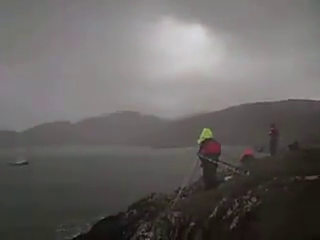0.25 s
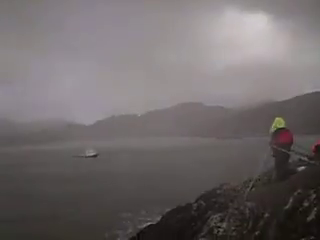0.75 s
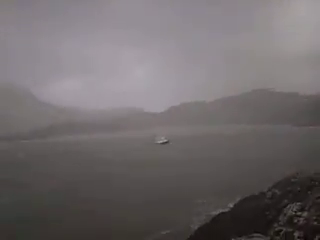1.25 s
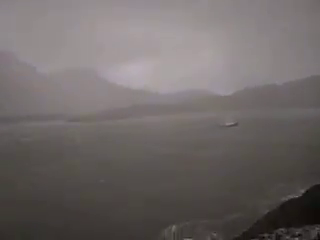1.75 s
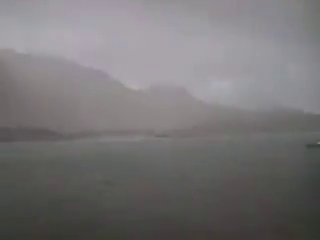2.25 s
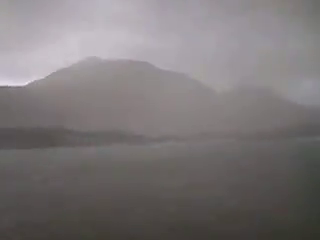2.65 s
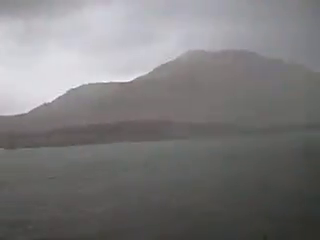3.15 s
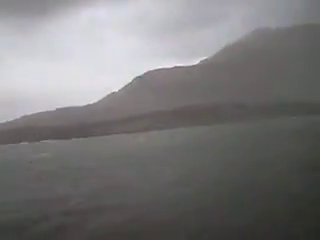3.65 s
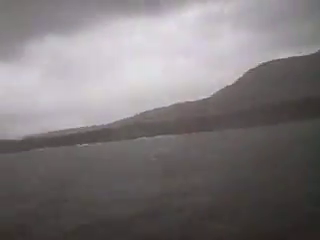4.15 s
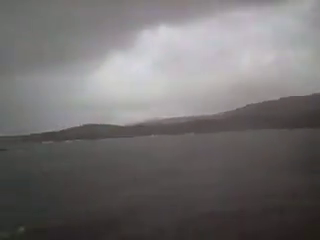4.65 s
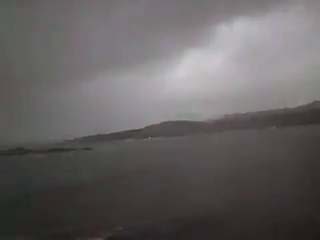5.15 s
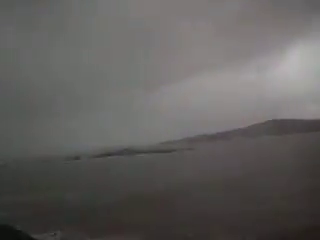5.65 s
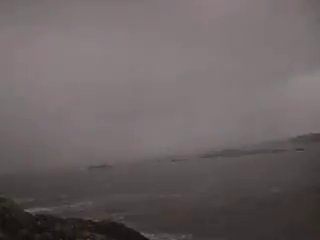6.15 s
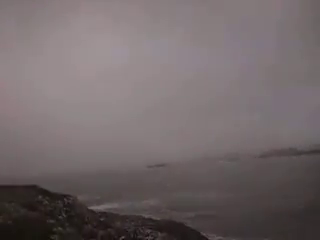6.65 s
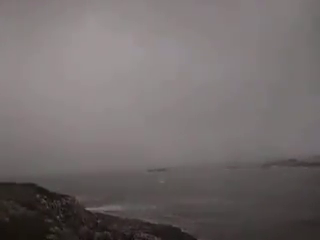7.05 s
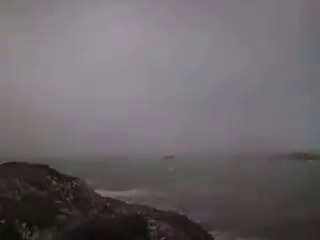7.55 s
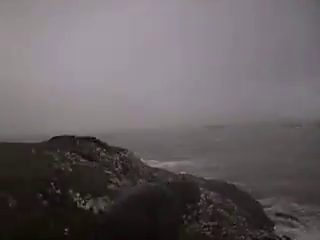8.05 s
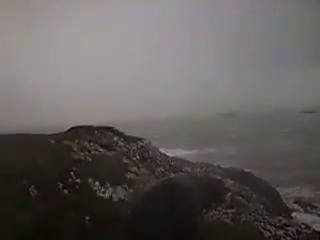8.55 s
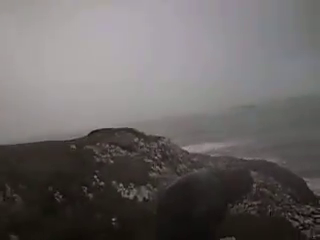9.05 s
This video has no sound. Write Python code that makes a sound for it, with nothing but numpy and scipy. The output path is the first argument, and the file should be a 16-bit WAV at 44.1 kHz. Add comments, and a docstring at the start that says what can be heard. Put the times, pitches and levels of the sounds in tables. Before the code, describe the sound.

Outdoors on a rocky shore, hail falls on a small hand-held camera, heard from its built-in microphone. At first there is a faint, flickering hiss of hail on rock and water, a barely audible wavering low hum and very light ticking. A tap at 0.15 s is followed by hard, overloaded cracks near 0.4 to 0.55 s and more around 0.85 s. From about 1 s the hits crowd together, and by 1.6 s patter and hiss have swelled. Dense, irregular clicking then continues, with soft ticks, brittle plastic snaps and blunt knocks in uneven clusters, some with a short loose rattle. Especially strong blows land near 2.15, 5.6 and 8.1 s. Faint hollow notes sound around 6.2, 7.2 and 8.6 s. The sound is close, dry and narrow-band, dull on top, distorted on the loudest hits, and ends still hailing at about 9.3 s.

```python
"""Hail on a rocky shore, heard through the microphone built into a small hand-held camera.
From the start noise bands hiss like hail on rock and water, over a low hum of two wavering sines.
Single stones, loud and soft, crack on the plastic housing, ring its modes and shove the diaphragm;
the strongest overload the input. Over the first 1.6 s the patter of small stones and the hiss swell.
The hail goes on to the end, and from about 6 s three stones also sound a low hollow note."""
import sys
import numpy as np
from scipy import signal
from scipy.io import wavfile

SR = 44100
rng = np.random.default_rng(int(sys.argv[2]) if len(sys.argv) > 2 else 0)


def digitize_waveform(pressure):
    """Quantize a signal to 16-bit integers and store it at the path in sys.argv[1].

    Rows of a 2-D input are taken as channels; values are limited to [-1, 1].
    """
    field = np.atleast_2d(pressure).T
    bounded = np.clip(field, -1, 1)
    quanta = np.round(bounded * 32767).astype(np.int16)
    wavfile.write(sys.argv[1], SR, quanta)


N = 409248


def from_db(db):
    """Decibels to gain."""
    return 10 ** (np.asarray(db) / 20)


def rms_one(x):
    """Scale to rms 1."""
    return x / np.sqrt(np.mean(x ** 2) + 1e-20)


def in_time(rows):
    """Draw straight lines between the rows of a table: one curve per column, at every sample."""
    s, *columns = np.transpose(rows)
    return [np.interp(np.arange(N) / SR, s, column) for column in columns]


def drift(corner_hz):
    """Slow random wander of spread 1: noise through two one-pole low-passes."""
    step = 40   # samples between the slow values
    r = np.exp(-2 * np.pi * corner_hz * step / SR)
    noise = rng.standard_normal(N // step + 2002)
    slow = signal.lfilter([1], [1, -2 * r, r * r], noise)[2000:]   # drop the filter's run-in
    return np.interp(np.arange(N) / step, np.arange(len(slow)), rms_one(slow))


def ring(clicks, hz, t60_s):
    """A two-pole resonator: each unit click starts a sine of height 1 that falls 60 dB in t60_s."""
    r = np.exp(-np.log(1000) / (t60_s * SR))
    w = 2 * np.pi * hz / SR
    return signal.lfilter([0, np.sin(w)], [1, -2 * r * np.cos(w), r * r], clicks + 1e-18)


def clicks_at(seconds, sizes):
    """One-sample clicks of the given sizes."""
    out = np.zeros(N)
    places = np.round(np.asarray(seconds) * SR).astype(int)
    np.add.at(out, np.minimum(places, N - 1), sizes)
    return out


# the two hum tones, levels before their shared waver: pitch_hz [Hz], level_db [dB rms]
HUM_TONES = [(36, -52.5), (66, -48.5)]


def hum():
    """Two low sines whose pitch and level waver a little together."""
    waver_cycles = np.cumsum(1.18 * drift(2.3)) / SR   # pitch wander, 1.18 Hz spread
    tones = 0
    for pitch_hz, level_db in HUM_TONES:
        cycles = pitch_hz * np.arange(N) / SR + waver_cycles + rng.random()
        tones = tones + np.sqrt(2) * from_db(level_db) * np.sin(2 * np.pi * cycles)
    return from_db(drift(10)) * tones


# tone of the hiss, relative before the whole is levelled: band_hz [Hz], density_db [dB per Hz]
HISS_TONE = [(30, -18.5), (75, 5), (565, -2.5), (1200, 6.5), (1500, -6.5), (2600, 3), (3600, -18.5)]


def far_hiss(hiss_db, patchy_db):
    """Hail on rock and water blurs into noise: half-octave bands, each flickering a little."""
    edges_hz = 28 * 2 ** np.arange(0, 8, .5)
    white = rng.standard_normal((2, N))   # neighbouring bands take different noise
    tone_hz, tone_db = np.transpose(HISS_TONE)
    out = 0
    for k, (low, high) in enumerate(zip(edges_hz, edges_hz[1:])):
        band_pass = signal.butter(2, [low, high], "band", fs=SR, output="sos")
        band = signal.sosfilt(band_pass, white[k % 2])
        centre_db = np.interp(np.log(low * high) / 2, np.log(tone_hz), tone_db)
        out = out + band * from_db(centre_db + patchy_db * drift(14.0))
    return from_db(hiss_db) * rms_one(out)


# strength and decay of each housing mode, damped panels first, then longer-ringing inner parts:
# level_db [dB, relative within one blow], t60_s [s to fall 60 dB]
HOUSING_MODES = np.array([(-24.5, 0.031), (-18.5, 0.022), (-15.5, 0.053), (-6.5, 0.021), (-6.5, 0.021),
                 (-6, 0.02), (-7.0, 0.021), (-7, 0.016), (0.5, 0.0042), (-5.5, 0.021), (-4, 0.014),
                 (-4.5, 0.0093), (-5, 0.0095), (-11.5, 0.0089), (-2.5, 0.006), (-1, 0.003), (-24.5, 0.081),
                 (-19.0, 0.11), (-24, 0.16), (-30.5, 0.14), (-30.5, 0.22), (-35, 0.17), (-27, 0.25),
                 (-35, 0.15), (-37, 0.12)])
# pitch of each housing mode, in the same order: pitch_hz [Hz]
MODE_HZ = np.array([625, 790, 1050, 1200, 1310, 1730, 1860, 2060, 2350, 2630, 2760, 3200, 3600, 3950, 1400, 3350, 638, 858, 1338, 1570, 1888, 2403, 2542, 2940, 3035])
BRIGHT_INNER = 0.4   # share of a stone's brightness that reaches the longest-ringing parts


def colour(bright_db, shake_db):
    """The landing spot tilts high modes against low ones and shakes the inner parts more or less."""
    t60_s = HOUSING_MODES.T[1]
    height = np.clip(np.log2(MODE_HZ / 1800), -.5, .5)   # low modes -.5, high modes +.5
    lasting = np.clip(np.log10(t60_s / 0.037), 0, 1)   # damped panels near 0, the longest ringing 1
    tilt = height * (1 - (1 - BRIGHT_INNER) * lasting)
    return np.outer(bright_db, tilt) + np.outer(shake_db, lasting)


COMMON_SHOVE_DB, MIDDLE_SHAKE_DB = -21.5, -2.5   # dB; shake is the middle of a random spread


def chance_colour(s, peak_db):
    """Blows with one common shove level, each on a random spot: duller or brighter, shaking more or less."""
    bright_db, shake_db = 7.0 * rng.standard_normal((len(s), 2)).T
    shove_db = np.full(len(s), COMMON_SHOVE_DB)
    return s, peak_db, colour(bright_db, MIDDLE_SHAKE_DB + shake_db), shove_db


def patter(per_s, faint_db):
    """Small stones fall at random moments in loose swarms, many faint and a few louder."""
    swarm = from_db(4.0 * drift(5))
    born = np.flatnonzero(rng.random(N) < per_s * swarm / SR)
    size_db = 5.95 * np.minimum(rng.exponential(1, len(born)), 2.8)
    return chance_colour(born / SR, faint_db[born] + size_db)


# single stones on the housing, with one common shove level and random brightness:
# start_s [s], peak_db [dB, before any flutter or overload]
PLAIN_STONES = [(1.085, -11.5), (1.113, -16), (1.195, -10), (1.322, -15.5), (1.632, -17), (1.644, -16.5),
                (1.692, -16), (1.784, -14), (1.794, -16.5), (1.814, -12.5), (2.012, -7), (2.41, -26),
                (2.539, -12.5), (2.67, -12), (2.842, -11), (3.011, -9), (3.351, -14), (3.449, -7),
                (3.697, -13), (3.747, -13.5), (3.765, -9), (4.061, -11), (4.081, -10.5), (4.104, -18),
                (4.176, -20), (4.200, -15), (4.243, -20), (4.283, -16), (4.321, -17), (4.441, -18),
                (4.485, -13.5), (4.616, -13), (4.675, -14.5), (4.766, -16), (4.939, -14.5), (5.091, -16),
                (5.151, -16), (5.224, -14), (5.249, -14.5), (5.341, -12), (5.372, -18), (5.471, -15.5),
                (5.518, -12), (5.528, -15), (5.613, -15), (5.687, -18.5), (5.834, -12.5), (5.851, -19),
                (6.165, -6.5), (6.432, -13), (6.678, -9), (6.956, -14), (7.248, -15.5), (7.342, -20),
                (7.408, -15), (7.543, -13), (7.564, -18), (7.594, -6.5), (7.678, -19), (7.697, -19.5),
                (7.809, -20), (7.853, -19), (7.882, -22), (8.002, -13.5), (8.047, -13), (8.341, -9),
                (8.459, -12.5), (8.522, -7), (8.563, -7), (8.831, -8.5), (8.839, -10.5), (8.898, -6.5),
                (9.000, -15), (9.007, -10.5), (9.040, -11), (9.096, -17), (9.143, -14), (9.261, -16)]


def plain_stones():
    """Single stones on the housing, with one common shove level and random brightness."""
    return chance_colour(*np.transpose(PLAIN_STONES))


FLUTTER_DB, FLUTTER_HZ = 3.0, 47   # spread in dB and corner of the random wander in Hz


def flutter():
    """Loose parts waver in level as they ring."""
    return from_db(FLUTTER_DB * drift(FLUTTER_HZ))


# stones that strike a hollow part, peak before the flutter: start_s [s], peak_db [dB]
HOLLOW_STONES = [(6.242, -18), (7.16, -24), (8.591, -17)]


def hollow_notes():
    """A few stones ring one low hollow part, a single fluttering mode."""
    start_s, peak_db = np.transpose(HOLLOW_STONES)
    return ring(clicks_at(start_s, from_db(peak_db)), hz=710, t60_s=0.13) * flutter()


# single stones on the housing, from soft taps to overloading cracks:
# start_s [s], peak_db [dB, before any flutter or overload], shove_db [dB, diaphragm shove against crack],
# bright_db [dB, high against low modes], shake_db [dB, shake of the ringing inner parts]
COLOURED_STONES = [(0.155, -12, -14, 13, -3), (0.375, 7, -3, -1, -1), (0.451, 4.5, -3.5, 1, 6),
                   (0.551, 2.5, -0.5, 7, 2), (0.676, -4, -44, 0, -12), (0.844, 1.5, -9, 4.5, 2.5),
                   (0.964, -1, -14, -1, -5.5), (1.039, 1.5, -7, 0.5, -5), (1.159, -2.5, -8, -0.5, 0),
                   (1.252, -0.5, -13.5, 1, -4), (1.305, -3.5, -10, 0, -5), (1.332, -3, -10.5, -3, -7),
                   (1.432, 4.5, -2.5, 4.5, 0), (1.455, -7.5, -9, 5, 4), (1.478, -7.5, -9, 1, -9),
                   (1.542, 3.5, -1.5, 3, 4.5), (1.579, -1, -6.5, 6.5, 10.5), (1.604, -4.5, -28, -5, 10),
                   (1.711, -7.5, -12.5, 13, 7), (1.842, 3, -20, 3, -6), (1.855, 4.5, 0.5, -3, -3),
                   (1.871, -3.5, -25, 2, -12), (1.902, -3.5, -13.5, -1.5, 3), (1.921, -3.5, -22, -1, -1),
                   (2.058, -6, -13, 1.5, -3), (2.075, -9, -29, -16, -4), (2.148, 8, -3, -11, -34),
                   (2.154, -3, -17, 7.5, 13), (2.184, -2.5, -11, 5, 13), (2.352, 4.5, -6, 3, 5),
                   (2.486, 0, -11, 1, -9), (2.63, -5, -34, 10, 3), (2.694, -6, -18, 0, 8),
                   (2.707, -3, -22, 1, 7.5), (2.746, -2.5, -13, -9, -4), (2.793, 4.5, -5.5, 11.5, -7),
                   (2.815, -2.5, -35, 3, -14), (2.861, -2.5, -11, -11, -1), (2.914, 3.5, -5, 8, -6),
                   (2.935, -3, -8, -6.5, 11.5), (2.955, -4, -13, -10, -17), (3.029, -2.5, -7, -1, -3),
                   (3.074, 2.5, -12, 0.5, -1.5), (3.114, -7.5, -7, -2, -9), (3.148, 2, -10.5, -2.5, -9),
                   (3.309, 2.5, -7.5, -7.5, -7), (3.335, -6, -19, 8, 1), (3.345, -4, -14, 0, -5),
                   (3.371, -5.5, -14, -8, -6), (3.399, -10, -5, -1, -7), (3.422, 2.5, 1, -0.5, 5),
                   (3.493, 0, -7, -8.5, -6), (3.574, -1, -3, 3, -2), (3.618, -10, -13, 20, -14),
                   (3.755, -5.0, -36, -2, -2), (3.783, 3, -9.5, 12, -18), (3.816, -2.5, -7.5, 0, 2),
                   (3.825, -3.5, -7.5, -3, -4), (3.847, -2.5, -11, 2, -1), (3.904, -10, -37, -12, 0),
                   (3.927, -3.5, -20, 5, -17), (3.972, -3.5, -27, -1, -2), (4.008, -4.0, -17, 7, -6),
                   (4.023, -4.5, -16, 3, -6), (4.044, -11, -18, -4, -5), (4.072, -3, -3.5, -8, 0),
                   (4.109, 1.5, -8, -8, 7), (4.149, -1, -10.5, 2, -34), (4.186, -3.5, -11, -5, 0),
                   (4.207, -6.5, -34, 17, -6), (4.223, -4, -16, -4.5, -8), (4.258, 3.5, -0.5, 5, -2),
                   (4.352, 0.5, -7.5, -1.5, 0), (4.383, -4, -13, -11, -9), (4.453, 4, -3, -4, -14),
                   (4.462, -5, -14, 17, 12), (4.539, -8.5, -15, -5.5, -2), (4.558, -0.5, -42, 1, -11),
                   (4.566, -1.5, -4, 19, -32), (4.631, -6.5, -6.5, -6, 0), (4.721, 2, -5.5, -0.5, 3.5),
                   (4.741, -4, -10, 3, -8), (4.823, -1.5, -0.5, -1, 0), (4.852, -2.0, -27, 2, -16),
                   (4.972, -6, -5, -1, 4), (4.989, -2, -14, -3, -9), (5.031, -6, -12, -38, -9),
                   (5.057, 1.5, -7, -9, 2), (5.077, -4.5, -23, -5.5, -8), (5.125, 1.5, -8.5, 6, 4),
                   (5.130, -5.5, -19, -4, -7), (5.201, 3, -5.5, 10, -6), (5.302, 1, -4, 11, 6),
                   (5.319, -3.5, -17, 5, -4), (5.395, -14, -23, -19, 8), (5.424, 1, -8.5, 2.5, -3),
                   (5.449, -3, -10, -6, -8), (5.548, 3.5, -5, 10, -1), (5.558, -5, -19, 4, -20),
                   (5.63, 7, -1.5, 11, 5), (5.804, -8, -20, 0, 3), (5.859, 5.5, -3, 5.5, -5),
                   (5.928, -6.5, -41, -9, 1), (6.021, -1, -10, -3, -32), (6.179, 1, -15, 20, -35),
                   (6.236, -1.5, -7, 16, -6), (6.241, -3, -25, -5, 4), (6.454, 2.5, -5.5, -6, -30),
                   (6.546, 4.5, -11.5, 0, -7), (6.602, 1, -15.5, -4, -14), (6.634, -3, -15, 4, -29),
                   (6.716, -6.5, -15, 1.5, 1), (6.758, -2.5, -40, 11, -10), (6.805, -9, -9, 5, 6),
                   (6.826, -1, -18.5, 9, 11), (6.834, -3, -7, -1, -14), (6.898, -2, -10.5, 17, -5),
                   (6.985, 0, -10.5, 4, -11), (7.008, -7, -10, 7, 13), (7.072, 0.5, -8.5, 1.5, -5),
                   (7.091, -5.5, -30, 16, 13), (7.096, -2, -5, -4, -13), (7.16, -5.5, -35, 6, -2),
                   (7.268, -2, -51, 18, -28), (7.366, -3.5, -32, 3, -18), (7.373, 0, -14, 3, -7),
                   (7.42, 0, -10, 0.5, 3), (7.487, 0.5, -9, -0.5, -6), (7.509, -6, -21, 14, 6),
                   (7.578, -3, -6, -0.5, -1), (7.619, -4, -31, 16, 1), (7.628, -3.5, -24, -8, -13),
                   (7.651, -10, -36, -13, 2), (7.758, -8.5, -9, -5, -22), (7.824, 0, -2.5, -3, -6),
                   (7.83, -2, -12, -4, -17), (7.945, -3, -13, 1.5, -6), (8.009, -2, -26, 8, -17),
                   (8.036, -11, -39, -24, -6), (8.07, -3.5, -20, -4.5, -26), (8.109, 7.5, -3, 22, 7),
                   (8.175, 0, -7, 17, -25), (8.236, 1.5, -2.5, 9, -22), (8.285, -0.5, -10, 0.5, 1),
                   (8.321, -3, -17, -7, -6), (8.443, -7, -1.5, 0, -3), (8.51, 2, -9.5, 6, -1),
                   (8.531, -1.5, -17, -2.5, -2), (8.571, -2.5, -13, 10, 3), (8.587, -1, -7, -2, 6),
                   (8.591, -4, -21, 12, -2), (8.621, -3, -7.5, -6, -26), (8.658, -5.5, -21, 7, -2),
                   (8.691, 2, -4.5, 0.5, 9), (8.714, -10, -7, 18, 1), (8.729, -2, -27, -3, -2),
                   (8.755, 0.5, -16, 10, -9), (8.769, -3, -18, 1, -9), (8.815, -9, -8, -3, 3),
                   (8.88, -8, -15, 7, 3), (8.891, -2.5, -3, 16, -11), (8.934, -9, -23, 18, -1),
                   (8.945, 4, -4, 12, 2), (9.056, 3.5, -7.5, -0.5, -20), (9.101, -2, -10, 4, 7.5),
                   (9.169, -13, -8, 1, 4), (9.189, -10, -15, 0, 12), (9.206, -3.5, -13, 3, 3),
                   (9.228, 0.5, -5.5, -1, -16), (9.239, -4, -25, 6, 0), (9.271, -2.5, -8, 11, -25.0)]


def coloured_stones():
    """Single stones from soft taps to overloading cracks, each with its own shove, brightness and shake."""
    start_s, peak_db, shove_db, bright_db, shake_db = np.transpose(COLOURED_STONES)
    return start_s, peak_db, colour(bright_db, shake_db), shove_db


THUMP_S, CONTACT_S = 0.00045, 0.00080   # s: rise of the shove, longest delay of a mode
SPOT_SPREAD_DB = 5.0   # dB, how much the landing spot changes the damped modes


def strike_housing(seconds, peak_db, colour_db, shove_db):
    """A blow rings every mode with its own strength, sign and slight delay, and shoves the diaphragm."""
    level_db, t60_s = HOUSING_MODES.T
    shape = (len(seconds), len(MODE_HZ))
    # inner parts are shaken through the whole housing, so the longer a mode rings the less the spot matters
    spread_db = SPOT_SPREAD_DB / (1 + (t60_s / 0.11) ** 4)
    spot_db = spread_db * np.clip(rng.standard_normal(shape), -2, 1.1)
    size = from_db(level_db + colour_db + spot_db) * rng.choice([-1, 1], shape)
    # the shortest modes are delayed least, so the dry crack comes first
    late_s = CONTACT_S * rng.random(shape) * np.minimum(t60_s / 0.012, 1)

    # preview the first 3 ms of each blow to set its peak
    time = np.arange(0, .003, 1 / SR)
    age = np.maximum(time - late_s[..., None], 0)
    decay = np.exp(-np.log(1000) * age / t60_s[:, None])
    rings = np.sin(2 * np.pi * MODE_HZ[:, None] * age) * decay
    crack = (size[..., None] * rings).sum(axis=1)
    crack_peak = np.abs(crack).max(axis=1)[:, None]
    size = size / crack_peak
    # the shove goes one way; crack and shove together reach the stone's peak
    shove = (time / THUMP_S * np.exp(1 - time / THUMP_S)) ** 2
    both = crack / crack_peak - np.outer(from_db(shove_db), shove)
    gain = from_db(peak_db) / np.abs(both).max(axis=1)

    ringing = 0
    for k, hz in enumerate(MODE_HZ):
        clicks = clicks_at(seconds + late_s[:, k], gain * size[:, k])
        mode = ring(clicks, hz, t60_s[k])
        if t60_s[k] > .06:   # the long-ringing inner parts are loose
            mode = mode * flutter()
        ringing = ringing + mode
    shoves = signal.fftconvolve(clicks_at(seconds, gain * from_db(shove_db)), shove)[:N]
    return ringing - shoves


# the shower, straight lines between rows: start_s [s], stones_per_s [small stones per s, before swarming],
# faint_db [dB, peak of the faintest small stone], hiss_db [dB rms, far hiss]
SHOWER_CURVES = [(0.0, 150, -49.5, -43), (1.6, 160, -40, -40.5), (6.1, 170, -38, -40),
                 (9.28, 220, -37, -40.5)]


def scene():
    """All sources summed at the microphone."""
    per_s, faint_db, hiss_db = in_time(SHOWER_CURVES)
    background = hum() + far_hiss(hiss_db, patchy_db=3.0)
    blows = zip(coloured_stones(), plain_stones(), patter(per_s, faint_db))
    hail = strike_housing(*[np.concatenate(column) for column in blows]) + hollow_notes()
    return (background + hail)[None]


OFFSET = -0.0037   # steady bias of the input stage
INPUT_TOP, OUTPUT_TOP = 0.82, 0.7   # clipping heights before and after the converter
BAND_HZ, CUTOFF_HZ = 4230, 17300   # Hz: converter's cutoff, then where the last filter is 70 dB down


def record(dry):
    """The input overloads, a narrow-band converter low-passes, its overshoot is clipped, the top is cut."""
    x = np.clip(dry + OFFSET, -INPUT_TOP, INPUT_TOP)
    taps = signal.firwin(numtaps=221, cutoff=BAND_HZ, window=("kaiser", 9.0), fs=SR)
    x = signal.fftconvolve(x, taps[None], "same")
    x = np.clip(x, -OUTPUT_TOP, OUTPUT_TOP)
    top_cut = signal.cheby2(12, 70, CUTOFF_HZ, fs=SR, output="sos")
    return signal.sosfilt(top_cut, x)


dry = scene()
out = record(dry)
digitize_waveform(out)
```